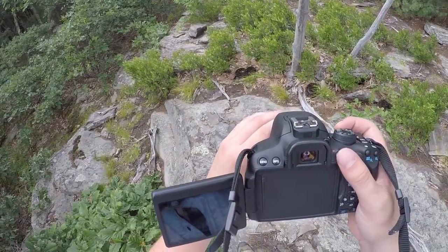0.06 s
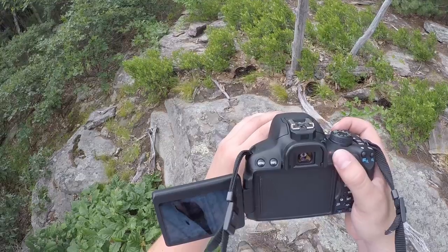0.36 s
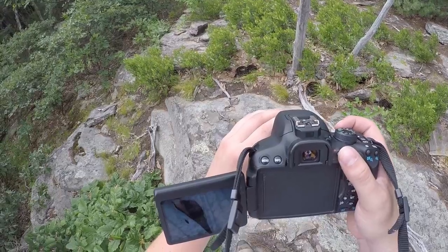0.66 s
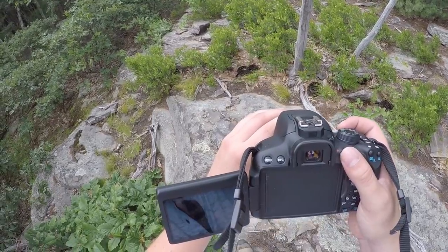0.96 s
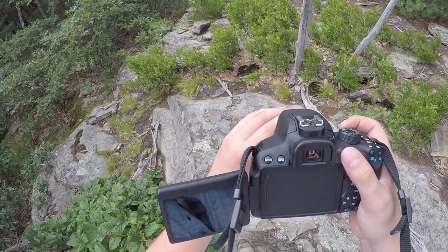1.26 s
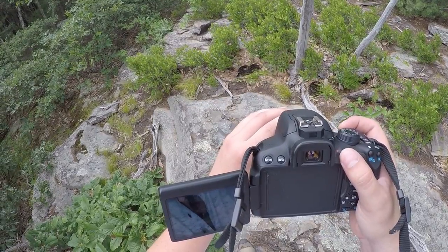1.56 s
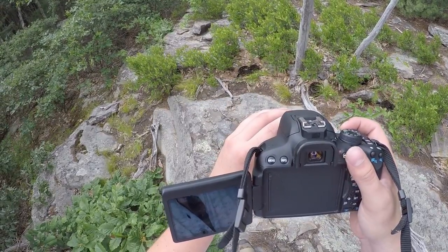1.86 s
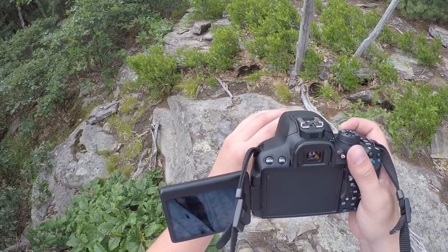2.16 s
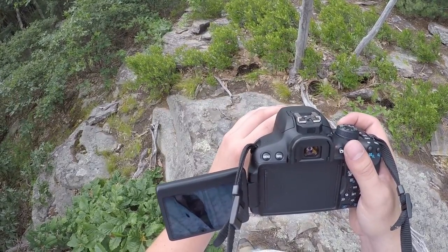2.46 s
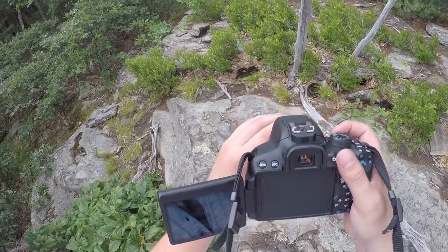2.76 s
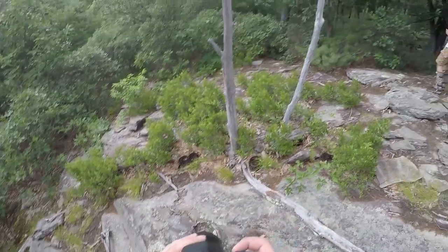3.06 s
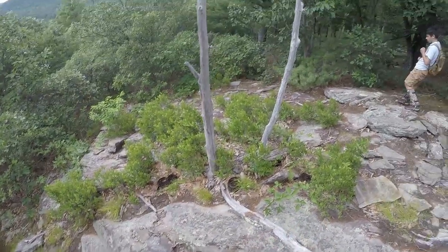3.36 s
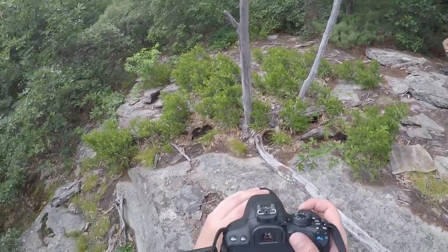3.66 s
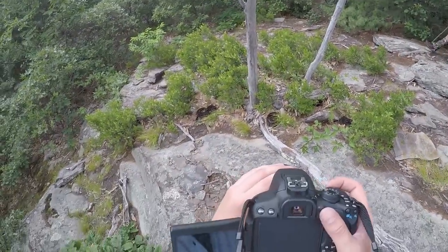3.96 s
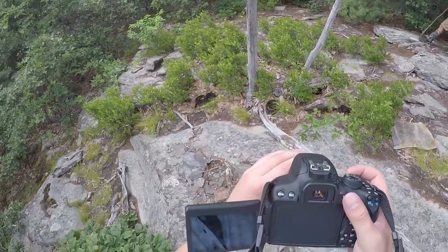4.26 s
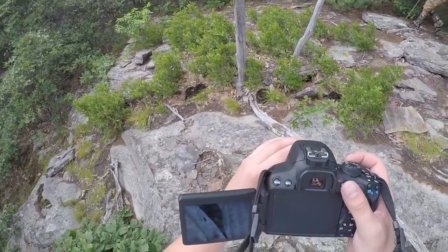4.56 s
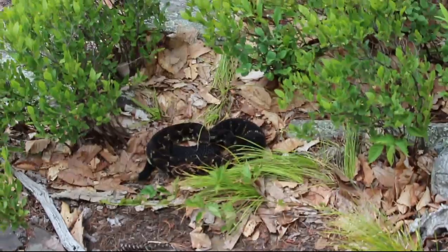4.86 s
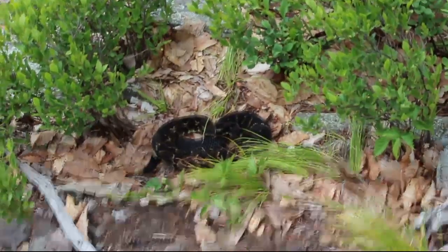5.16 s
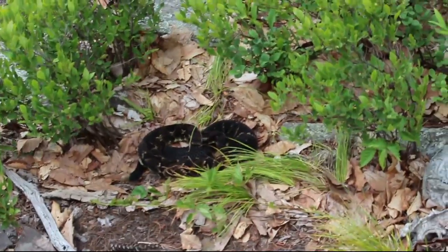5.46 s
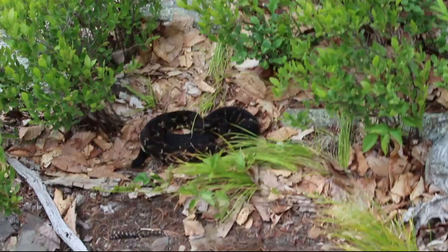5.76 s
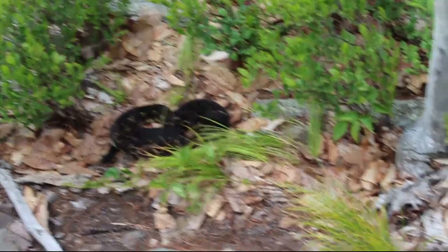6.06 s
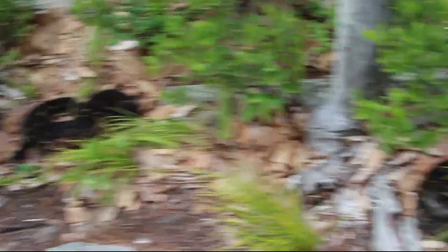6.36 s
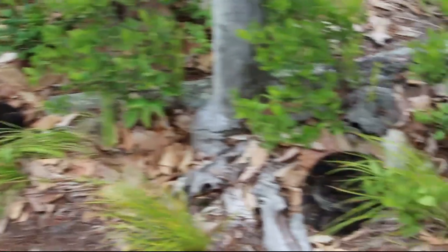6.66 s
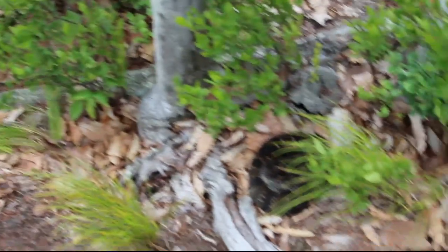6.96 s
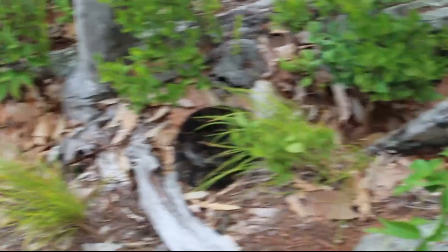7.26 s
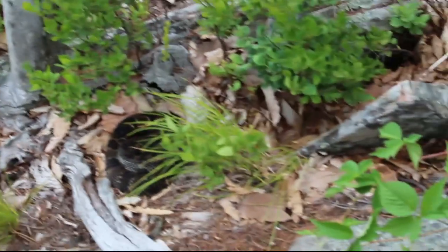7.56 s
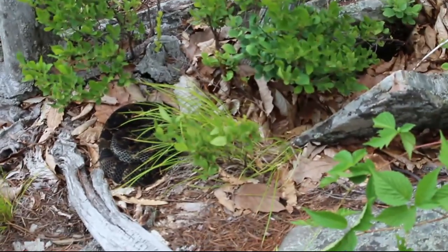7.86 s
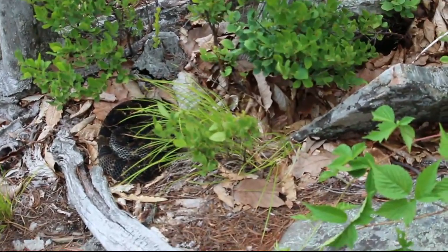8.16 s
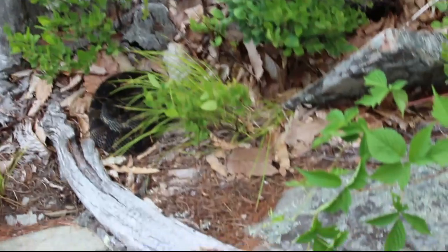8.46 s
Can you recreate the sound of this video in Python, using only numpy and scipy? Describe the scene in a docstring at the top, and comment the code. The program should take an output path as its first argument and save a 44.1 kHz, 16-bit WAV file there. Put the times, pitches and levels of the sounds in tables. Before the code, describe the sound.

On an outdoor rocky ledge, two rattlesnakes make a continuous, fast, sizzling rattle. One holds even while the other swells, accompanied by a hollow stone clunk, faint crunching steps and small twig snaps. A slightly hissy head-worn microphone gives way halfway through to a brighter hand-held one, where the swell and footsteps happen again and the grip bumps dully under the buzzing.

```python
"""Two rattlesnakes buzz on a rocky ledge over forest air, heard from a head-worn microphone; each tail
stroke clatters hollow horn segments. Feet scuff dry litter. From 2.2 s one snake flares up as a boot tips
a loose slab and twigs snap; it then slows, while the other keeps a nearly even pace. At 4.6 s the moment
plays again, from just before the flare, at a hand-held microphone that thumps under the shifting grip
and swings from one snake to the other."""
import sys
import numpy as np
from scipy import signal
from scipy.fft import rfft, irfft
from scipy.io import wavfile

SR = 44100
rng = np.random.default_rng(int(sys.argv[2]) if len(sys.argv) > 2 else 0)


def generate_wav(signal):
    """Clip the signal to [-1, 1] and save it as 16-bit WAV at the path in sys.argv[1]."""
    frames = np.transpose(np.atleast_2d(signal))
    scaled = np.clip(frames, -1, 1) * 32767
    pcm = np.round(scaled).astype(np.int16)
    wavfile.write(sys.argv[1], SR, pcm)


N = 375732
T = np.arange(N) / SR


def rattle(strokes_hz, beat_db, uneven_db, segment_db, jitter_cycles, clicks_per_s):
    """Loose segments collide nonstop, hardest where the tail reverses; each stroke shakes them unequally."""
    # Large to small. Each row: low edge in Hz, high edge in Hz, coupling to the stroke 0-1.
    segments = [(820, 4460, 0.8), (4430, 6175, 0.73), (6340, 10300, 0.97), (10560, 14500, 0.6)]
    phase = np.cumsum(strokes_hz) / SR + jitter_cycles * walk(90)
    stroke = phase.astype(int) + 1
    stroke_db = uneven_db * rng.standard_normal(4096)[stroke] - beat_db * np.cos(2 * np.pi * phase)
    out = 0
    for low_hz, high_hz, coupling in segments:
        collisions = (rng.random(N) < clicks_per_s / SR) * rng.standard_normal(N)
        own_db = segment_db * rng.standard_normal(4096)[stroke]
        force = unit(amp(coupling * (stroke_db + own_db)))
        out = out + butter(collisions * force, [low_hz, high_hz], "band", order=4)
    return unit(out)


def startle(start_s=2.19, pause_s=0.06, swell_s=0.94, fastest_hz=181, tire_db_per_s=0.95):
    """Stroke rate and force of the startled snake: idle, pause, swell, tire."""
    age_s = np.maximum(T - start_s, 1 / SR)
    strokes_hz = np.minimum(fastest_hz, 158 * age_s ** -0.094)
    idle = amp(-13 + 2 * np.minimum(T, start_s))
    moving = 1 - np.exp(-(2 * (T - start_s) / pause_s + 1) ** 2)
    swell = np.clip(age_s / swell_s, 0, 1)
    force = np.sqrt((1 - swell) * (idle * moving) ** 2 + swell)
    tiring = amp(-tire_db_per_s * np.maximum(age_s - swell_s, 0))
    return strokes_hz, force * tiring


def diffuse(buzz, wet_db, smear_hz):
    """The whirling rattle sprays sound over leaves and rock; each port gets its own smeared share."""
    # Short waves scatter most. Each row: frequency in Hz, relative gain in dB.
    spray = [(2800, -4.5), (4000, -6.5), (5500, 2), (9000, 1), (13000, 6)]
    envelope = np.sqrt(np.abs(butter(buzz ** 2, smear_hz, "low", order=1)))
    return buzz + amp(wet_db) * colour(envelope * rng.standard_normal((2, N)), spray)


def slab(gap_s=0.0045, dull_s=0.016, lowest_hz=165, blows=9):
    """A boot rings the hollow under a stone, which rocks on in fading, ever duller rebounds."""
    # Each row: start in s, relative level in dB, contact low-pass corner in Hz, rocking decay in s.
    knocks = [(2.490, -26.5, 2500, .002), (2.493, -25.5, 300, .002), (2.509, -25.5, 890, .003),
              (2.516, -23, 362, .004), (2.522, -22, 2500, 0.021), (2.592, -37.5, 432, .003),
              (4.199, -29.5, 700, .004), (4.2137, -21.5, 780, 0.0027), (4.609, -39, 700, 0.0018)]
    # Each row: frequency in Hz, relative level in dB, t60 in s.
    modes = [(177, -10.5, 0.056), (254, -4.5, 0.035), (334, -3, 0.026), (440, 1.5, 0.025), (580, 0, 0.015),
             (692, 1.5, 0.033), (980, -2, 0.012), (1300, 8, 0.0076), (1700, 6.5, 0.019)]
    out, t = np.zeros(N), T[:SR // 6]
    ring = sum(amp(db) * np.cos(2 * np.pi * hz * t) * np.exp(-np.log(1000) * t / t60_s)
               for hz, db, t60_s in modes)
    for start_s, db, corner_hz, rock_s in knocks:
        gaps_s = gap_s * np.exp(0.35 * rng.standard_normal(blows))
        for late_s in np.cumsum(gaps_s) - gaps_s[0]:
            top_hz = max(corner_hz * np.exp(-late_s / dull_s), 2 * lowest_hz)
            blow = butter(ring, [lowest_hz, top_hz], "band")
            add(out, start_s + late_s, amp(db) * np.exp(-late_s / rock_s) * blow / np.abs(blow).max())
    return scatter(out, wet_db=-15, t60_s=0.15)


def litter(grain_db=3, edge_ratio=1.86):
    """Grit and dry needles break under a sole in a run of tiny cracks."""
    # Each row: start in s, length in s, relative level in dB, band centre in Hz.
    scuffs = [(1.633, 0.011, -50, 1700), (2.768, 0.054, -47.5, 1360), (2.801, 0.18, -50.5, 1100),
              (3.066, 0.2, -57.5, 930), (3.527, .01, -46, 850), (3.544, 0.056, -51, 900)]
    out = np.zeros(N)
    cracks = rng.standard_normal(N) * amp(grain_db * rng.standard_normal(N))
    for start_s, length_s, db, hz in scuffs:
        count = int(length_s * SR)
        press = unit(cracks[int(start_s * SR):][:count]) * signal.windows.tukey(count, 0.5)
        crunch = butter(np.pad(press, (0, SR // 100)), [hz / edge_ratio, hz * edge_ratio], "band")
        add(out, start_s, amp(db) * crunch / np.sqrt(np.sum(crunch ** 2) / count))
    return scatter(out, wet_db=-1.5, t60_s=0.11)


def twigs():
    """Twigs snap underfoot."""
    # Each row: start in s, relative level in dB, pitch in Hz.
    snaps = [(2.8028, -23.5, 1420), (2.8135, -35, 1500), (3.613, -35, 1140)]
    return ticks(snaps)


def ticks(events, rise_s=0.00048):
    """Something stiff gives way with a tick a few cycles long."""
    out, t = np.zeros(N), T[:SR // 50]
    envelope = t / rise_s * np.exp(1 - t / rise_s)
    for start_s, db, hz in events:
        add(out, start_s, amp(db) * envelope * np.sin(2 * np.pi * hz * t))
    return out


def head_mic(steady, startled, force, feet, lift_s=(2.91, 3.03), lag_s=0.00056):
    """Small hissy ports favour the rattles' 5 kHz body; the colour shifts as the head lifts."""
    # Rattle spectra. Each row: frequency in Hz, relative gain in dB.
    steady_eq = [(1350, -71.5), (2300, -24.5), (2800, -23), (3010, -12), (3230, -8), (3640, -1.5),
                 (4370, -4.5), (5250, 1.5), (5710, -4), (6560, -2), (7520, -25.5), (8860, -21.5),
                 (9710, -34), (11000, -29), (14300, -65), (22000, -120)]
    flare_eq = [(1060, -43), (1800, -25), (1900, -26), (2670, -22.5), (3620, -19.5), (3910, -8),
                (4160, -5.5), (4710, -17), (5010, -1), (5680, -0.5), (6940, -14), (7740, -11), (8760, -33),
                (9770, -26.5), (11500, -36.5), (15000, -70), (22000, -120)]
    lifted_eq = [(1060, -45), (1800, -24.5), (2630, -22.5), (3200, -14), (4160, -5.5), (5330, 1.5),
                 (5900, -5), (6330, -13.5), (7560, -12.5), (8370, -25.5), (9550, -23), (10500, -34.5),
                 (11500, -37), (15000, -54), (22000, -120)]
    # Shading before and after the lift. Each row: frequency in Hz, left minus right in dB.
    lowered_ports = [(4200, -1.5), (4700, 2.5), (5400, -4), (6000, 7.5), (6600, -0.5), (7400, 6.5),
                     (8500, -4), (9300, -3), (10500, -9)]
    lifted_ports = [(4300, -1), (4900, 1), (5600, -8.5), (6200, 5), (6700, 9.5), (7800, 0), (9000, -2),
                    (10300, -11)]
    # Head shadow, microphone hiss, forest air. Each row: frequency in Hz, relative gain in dB.
    shadow_eq = [(200, -6.5), (400, -7), (700, -7.5), (1300, -8.5), (2400, -8)]
    hiss_eq = [(5000, -28), (9500, -15.5), (13800, 3), (15500, -5.5)]
    air_eq = [(30, -16), (90, -26.5), (125, -11.5), (160, 5), (260, 0), (400, -4.5), (700, -7.5),
              (1500, -12), (2500, -20.5), (8000, -27.5)]
    facing = turn(startled, flare_eq, lifted_eq, lift_s)
    buzz = place(colour(steady, steady_eq), db=-32.5) + force * place(facing, db=-27)
    lifted = np.interp(T, lift_s, [0, 1])
    buzz = (1 - lifted) * shade(buzz, lowered_ports) + lifted * shade(buzz, lifted_ports)
    # The feet are to the right: the left port hears them late and shadowed.
    left, right = butter(feet, 133, "high", order=4)
    left = colour(np.interp(T - lag_s, T, left), shadow_eq)
    feet = amp(5) * np.vstack([left, right])
    hiss = amp(-50) * unit(colour(rng.standard_normal(N), hiss_eq))
    return top_cut(buzz + feet + hiss + forest_air(air_eq, db=-47.5, width=1.53), hz=15250)


def hand_mic(steady, startled, force, feet, turn_s=(6.23, 7.05), swing_s=(6, 7.4)):
    """A brighter, fuller microphone swings right, so both snakes drift left."""
    # Spectra of the rattles and the forest air. Each row: frequency in Hz, relative gain in dB.
    steady_eq = [(1120, -39), (1900, -25.5), (2970, -9), (3220, -3.5), (4080, 1.5), (4450, -3.5), (4910, 1),
                 (5360, 1), (6380, 1.5), (6850, -5.5), (8020, -8), (9480, -14.5), (15500, -14)]
    startled_eq = [(1120, -39), (1900, -19.5), (2190, -16), (3000, -18), (3250, -16.5), (3840, -11.5),
                   (4120, -12.5), (4950, 1.5), (6110, -14), (7280, -12), (7880, -14.5), (9310, -13.5),
                   (10500, -20.5), (15000, -31.5), (15500, -25)]
    turned_eq = [(1120, -35.5), (1900, -16), (2900, -15), (3540, -12), (3840, -1), (4150, -6), (4490, -2),
                 (5170, 3), (5750, -6), (6220, -6.5), (6850, -8.5), (8160, -12.5), (9070, -3.5),
                 (10300, -19.5), (15500, -30)]
    air_eq = [(30, -8.5), (80, 4), (150, 1), (280, 1), (600, -2.5), (1200, -5), (2500, -20), (9000, -26),
              (15000, -18)]
    # Housing shading. Each row: frequency in Hz, left minus right in dB.
    ports = [(2200, 7), (3500, 9.5), (4700, 5), (6300, 5.5), (9000, 5.5), (15000, 5)]
    facing = turn(startled, startled_eq, turned_eq, turn_s)
    swing_db = np.interp(T, swing_s, [0, 2.5])
    steady = place(shade(colour(steady, steady_eq), ports), db=-30.5, left_db=swing_db + 1.7)
    startled = force * place(shade(facing, ports), db=-25.5, left_db=swing_db - 1)
    background = forest_air(air_eq, db=-47.5, width=0.59) + handling()
    return rock_echo(steady + startled) + amp([[9], [4.5]]) * feet + amp([[1], [-1]]) * background


def turn(buzz, before_eq, after_eq, span_s):
    """A rattle's colour crossfades as the microphone turns."""
    share = np.interp(T, span_s, [0, 1])
    return (1 - share) * unit(colour(buzz, before_eq)) + share * unit(colour(buzz, after_eq))


def shade(buzz, ports):
    """The housing shades each port differently."""
    return np.vstack([colour(buzz[0], ports, 0.5), colour(buzz[1], ports, -0.5)])


def place(buzz, db, left_db=0):
    """Distance and aim set a rattle's level and balance."""
    return unit(buzz) * amp(db + np.array([[1], [-1]]) * left_db / 2)


def rock_echo(buzz, gain=0.11):
    """One echo off the rock combs the buzz; the comb slides as the microphone moves."""
    # Each row: time in s, extra path in m.
    detour = [(4.6, 0.45), (5.8, 0.4), (6.2, 0.76), (6.6, 0.56), (7.1, 0.548), (8.5, 0.48)]
    lag_s = np.interp(T, *np.transpose(detour)) / 343
    return buzz + gain * np.array([np.interp(T - lag_s, T, port) for port in buzz])


def scatter(x, wet_db, t60_s):
    """Rock and leaves return a short spray of echoes, different at each port."""
    t = T[:SR // 8]
    spray = rng.standard_normal((2, len(t))) * np.exp(-np.log(1000) * t / t60_s)
    spray /= np.sqrt(np.sum(spray ** 2, axis=1, keepdims=True))
    return x + amp(wet_db) * signal.oaconvolve(np.atleast_2d(x), spray, axes=-1)[:, :N]


def handling(swell_s=0.004, finger_gap_s=0.04, settle_s=(8.04, 8.45), touch_db=-44, touch_hz=75):
    """Fingers flex the shell: a tick, and dull thumps that push the ports partly against each other."""
    # Grip shifts. Each row: start in s, length in s, relative level in dB, thump pitch in Hz.
    grips = [(4.742, .02, -37, 125), (4.952, .02, -37, 95), (5.855, .02, -33, 110), (5.927, .02, -39, 93),
             (6.569, .02, -42, 67), (6.755, .02, -43, 70), (7.877, .14, -30.5, 135),
             (8.479, .02, -34.5, 120)]
    # Each row: start in s, relative level in dB, pitch in Hz.
    shell_ticks = [(4.657, -29, 1420)]
    out, t = np.zeros((2, N)), T[:SR // 8]
    touches = [(start_s, touch_db, touch_hz) for start_s in rng.uniform(*settle_s, 7)]
    fingers = [(start_s + late_s, db, hz) for start_s, length_s, db, hz in grips
               for late_s in np.arange(0, length_s, finger_gap_s)]
    for at_s, db, hz in touches + fingers:
        push = rng.standard_normal((2, len(t))) * t * np.exp(-t / swell_s)
        mid, side = butter(push, [hz / 2, hz * 1.09], "band")
        mid, side = mid / np.abs(mid).max(), 1.96 * side / np.abs(side).max()
        add(out, at_s - swell_s, amp(db) * np.array([mid + side, mid - side]))
    return butter(out, 54, "high") + ticks(shell_ticks)


def forest_air(eq, db, width):
    """Distant forest murmur, gently wavering."""
    mid, side = colour(rng.standard_normal((2, N)), eq)
    return amp(db + 0.5 * walk(1.905)) * unit(np.array([mid + width * side, mid - width * side]))


def amp(db):
    """Decibels to gain."""
    return 10 ** (np.asarray(db) / 20)


def unit(x):
    """Scale each channel to rms 1."""
    return x / np.sqrt(np.mean(x ** 2, axis=-1, keepdims=True))


def walk(rate_hz):
    """Random drift with a spread near 1."""
    knots = rng.standard_normal(1024)
    return np.interp(T * rate_hz, np.arange(len(knots)), knots) * np.sqrt(3 / 2)


def add(track, start_s, sound):
    """Mix a sound into a track."""
    i = int(start_s * SR)
    track[..., i:i + sound.shape[-1]] += sound[..., :N - i]


def colour(x, eq, db_scale=1, taps=4096):
    """Minimum-phase filter through (Hz, dB) points."""
    hz, db = np.transpose(sorted(eq))
    bins_hz = np.arange(taps // 2 + 1) * SR / taps
    gain_db = db_scale * np.interp(np.log(bins_hz + 1), np.log(hz), db)
    cepstrum = irfft(np.log(amp(gain_db)))
    cepstrum[1:taps // 2] *= 2
    cepstrum[taps // 2 + 1:] = 0
    impulse = irfft(np.exp(rfft(cepstrum)))
    return signal.oaconvolve(np.atleast_2d(x), impulse[None], axes=-1)[:, :N]


def butter(x, hz, kind, order=2):
    """Low-, high- or band-pass."""
    return signal.sosfilt(signal.butter(order, hz, kind, fs=SR, output="sos"), x)


def top_cut(x, hz):
    """Steep low-pass."""
    return signal.sosfilt(signal.ellip(10, 0.2, 80, hz, fs=SR, output="sos"), x)


def scene(switch_s=4.634, replay_delay_s=2.955, waver_db=0.3, waver_hz=7):
    """The ledge heard from the head, then again from the hand."""
    steady_hz = 130.9 + 4 * T
    startled_hz, force = startle()
    steady = rattle(steady_hz, beat_db=1.3, uneven_db=0.25, segment_db=1.0,
                    jitter_cycles=0.044, clicks_per_s=10000)
    startled = rattle(startled_hz, beat_db=4.5, uneven_db=0.4, segment_db=1.5,
                      jitter_cycles=0.035, clicks_per_s=8000)
    steady = diffuse(steady, wet_db=-6, smear_hz=300) * amp(waver_db * walk(waver_hz))
    startled = diffuse(startled, wet_db=-0.5, smear_hz=400) * amp(waver_db * walk(waver_hz))
    feet = slab() + litter() + twigs()
    ledge = steady, startled, force, feet
    replay = [np.roll(x, int(replay_delay_s * SR), axis=-1) for x in ledge]
    return np.where(T < switch_s, head_mic(*ledge), hand_mic(*replay))


def record(dry):
    """The top treble is cut steeply."""
    return top_cut(dry, hz=15700)


dry = scene()
out = record(dry)
generate_wav(out)
```